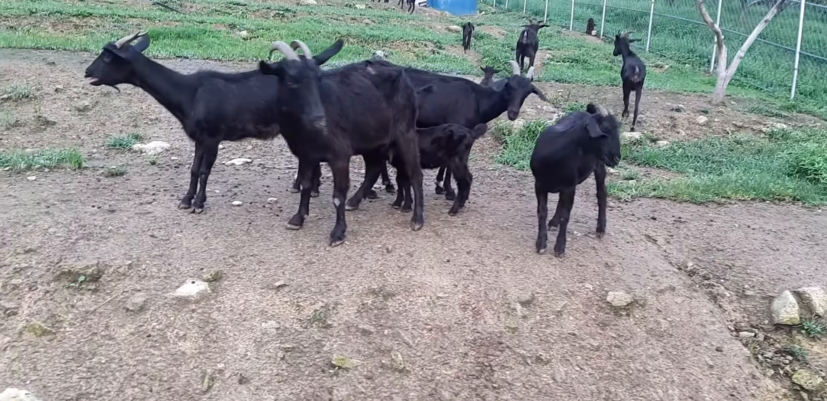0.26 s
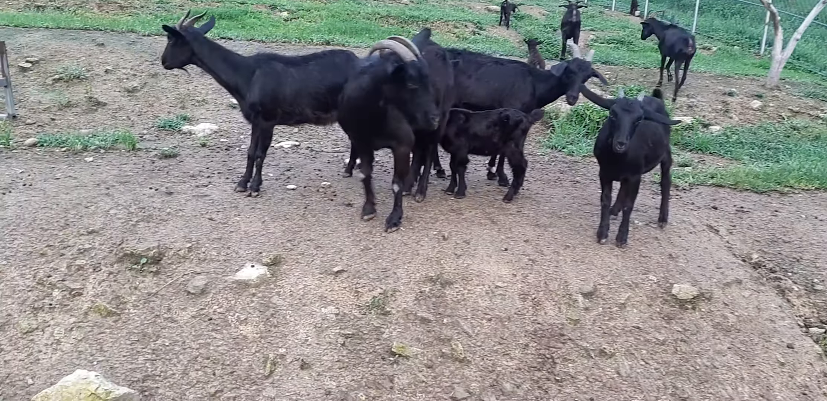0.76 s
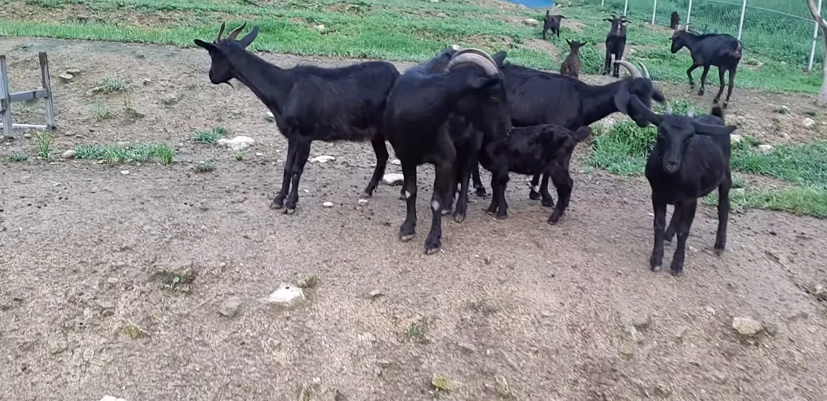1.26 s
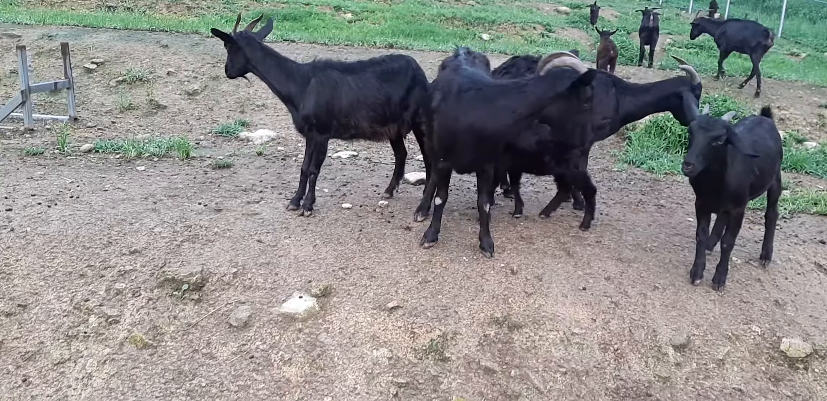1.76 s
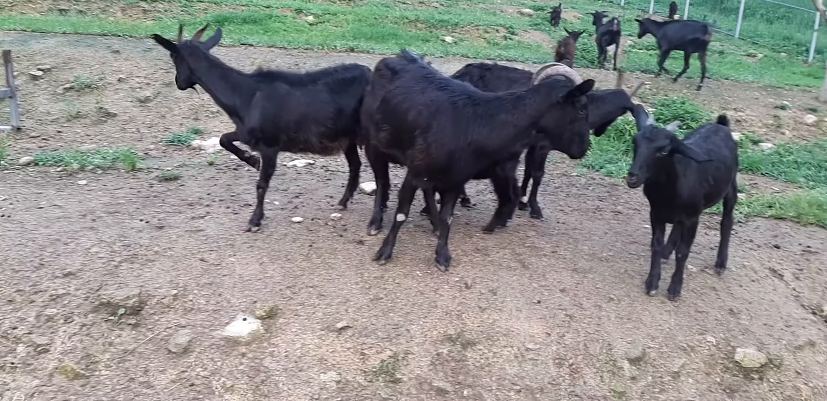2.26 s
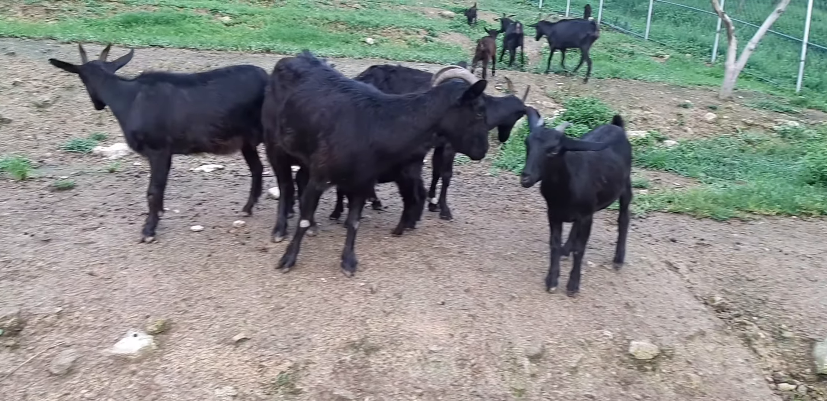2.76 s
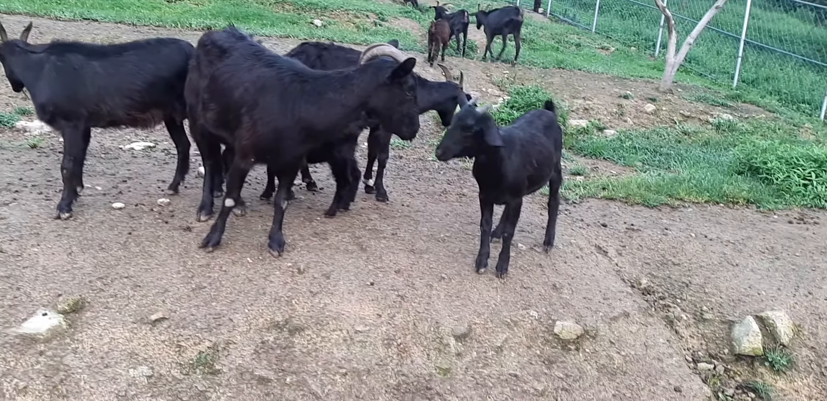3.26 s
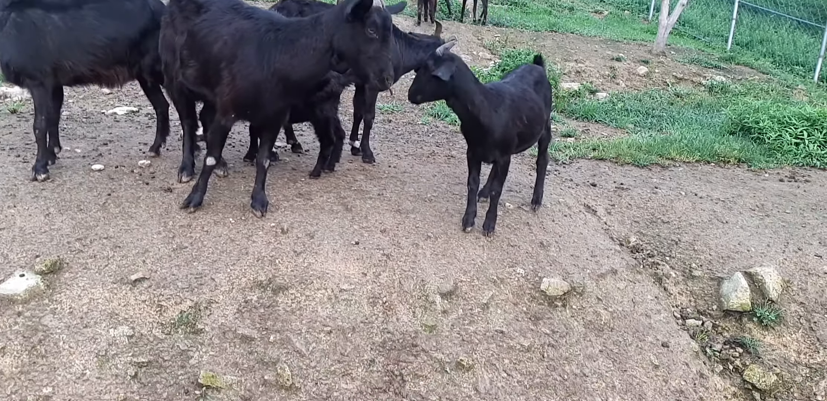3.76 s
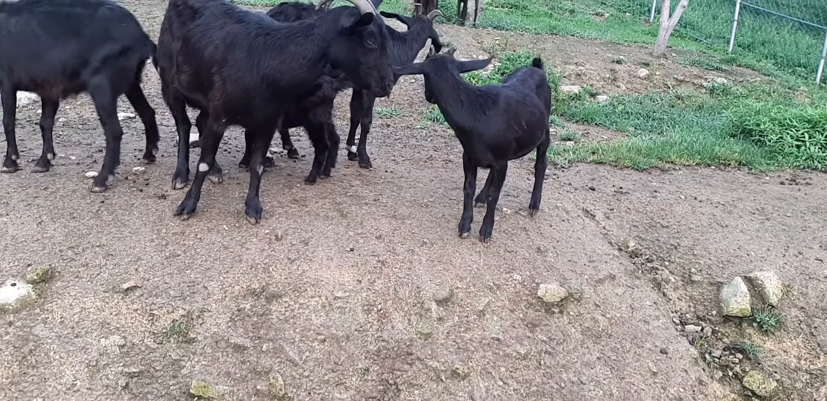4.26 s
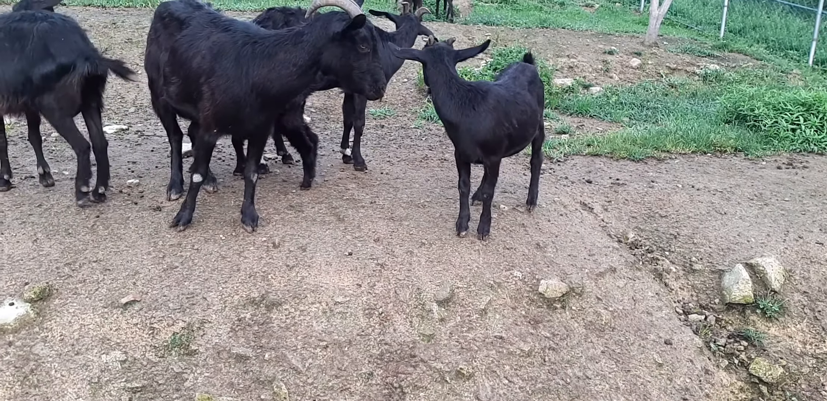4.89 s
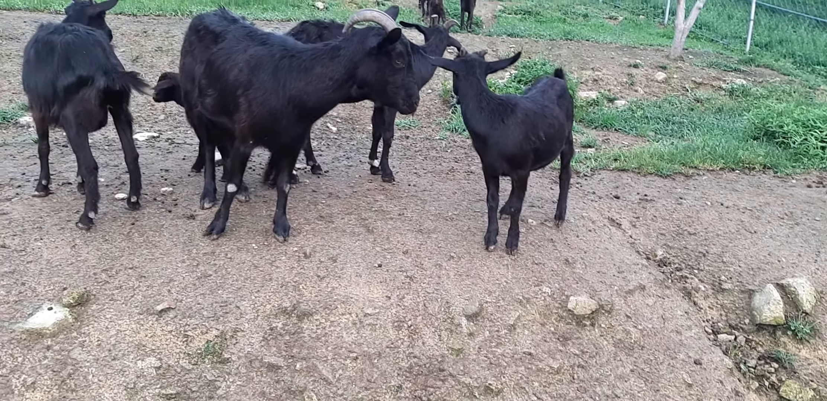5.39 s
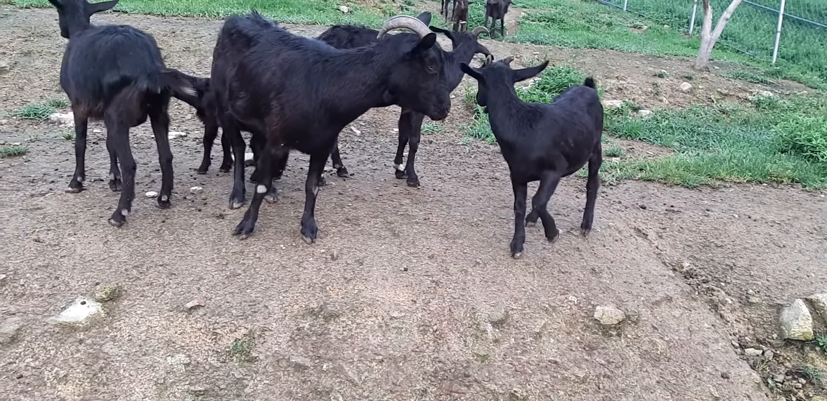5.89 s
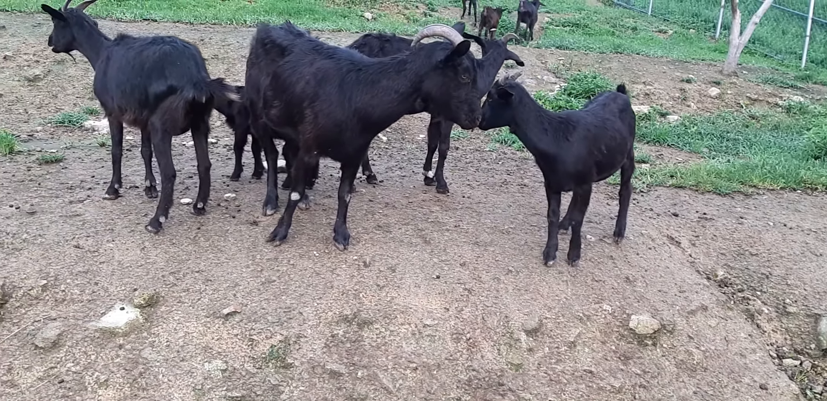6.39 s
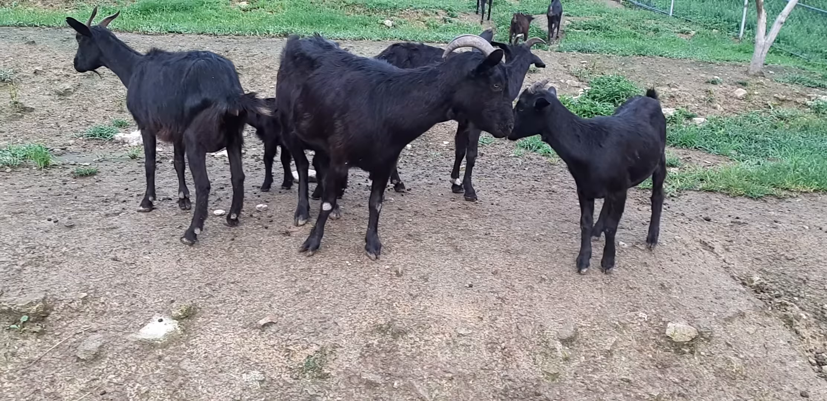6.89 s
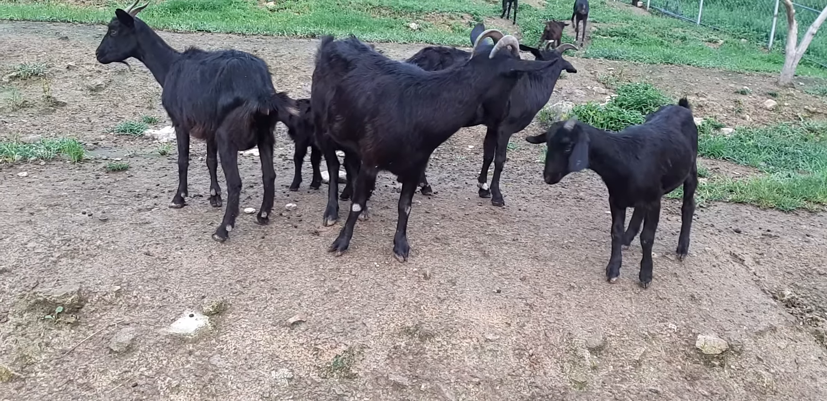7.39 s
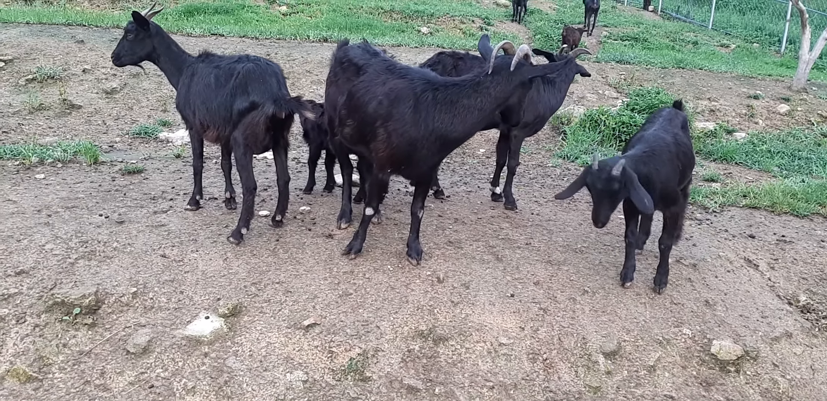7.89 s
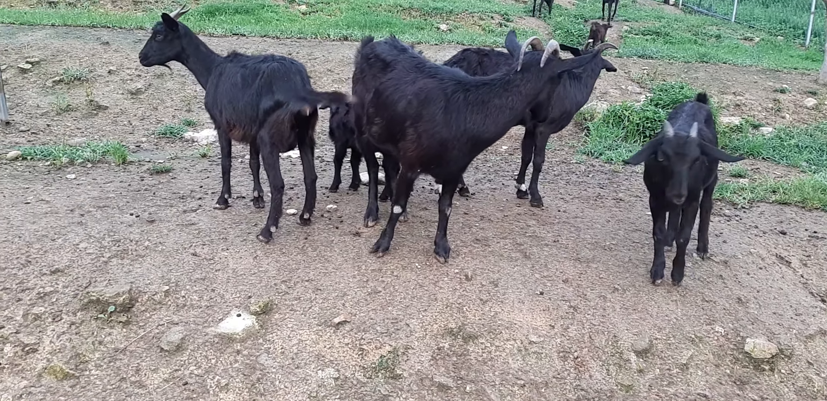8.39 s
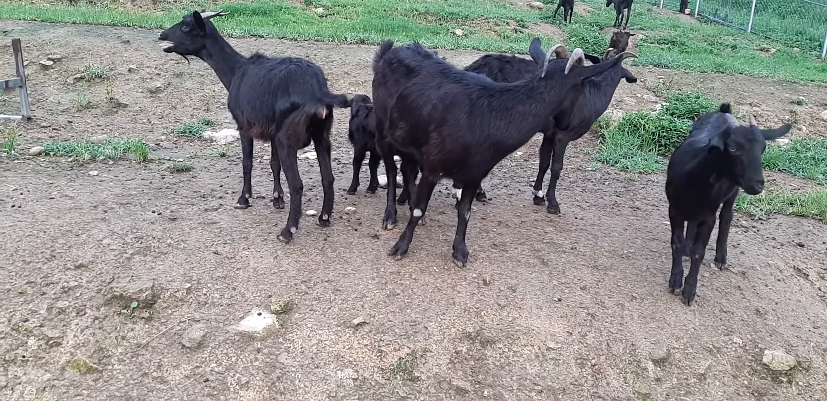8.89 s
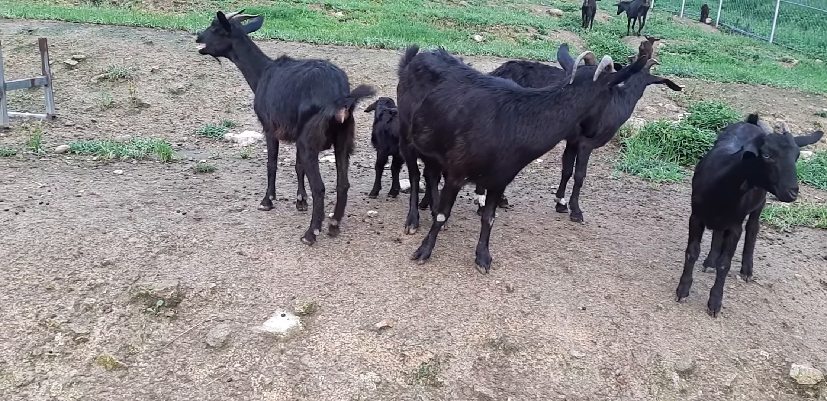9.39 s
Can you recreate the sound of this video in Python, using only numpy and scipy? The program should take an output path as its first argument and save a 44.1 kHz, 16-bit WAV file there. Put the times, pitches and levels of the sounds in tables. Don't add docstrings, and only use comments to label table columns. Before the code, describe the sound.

A near goat on the left bleats in throbbing bursts while herd members hum, call and yell over a steady insect hiss outdoors.

```python
import sys
import numpy as np
from scipy import signal
from scipy.fft import rfft, irfft, next_fast_len
from scipy.io import wavfile
from scipy.ndimage import uniform_filter1d, minimum_filter1d

SR = 44100
rng = np.random.default_rng(int(sys.argv[2]) if len(sys.argv) > 2 else 0)


def amplitude_ratio(level_db):
    exponent = np.asarray(level_db, float) / 20
    return 10 ** exponent


def pcm_store(signal):
    levels = np.round(np.clip(np.atleast_2d(signal), -1, 1) * 32767)
    wavfile.write(sys.argv[1], SR, levels.astype(np.int16).T)


N = 425565

# freq_hz, level_db
INSECT_SPECTRUM = [(1650, -72), (2800, -52), (2990, -28.5), (3350, -11.5), (3660, 0.5), (4320, -5),
                   (4710, 0), (5680, -1.5), (6100, -4.5), (6700, -29.5), (8630, -15), (10600, -40),
                   (15700, -36.5)]
# freq_hz, density_db_per_hz
WIND_SPECTRUM = [(15, -61), (25, -23.5), (70, -2.5), (114, -0.5), (242, -16), (429, -15), (637, -20.5),
                 (791, -17.5), (1400, -24.5), (2800, -25.5), (3640, -64.5), (6160, -120)]

# time_s, pitch_hz, effort_db
HUM_CALLS = [
    [(0.0, 424, -47.5), (0.264, 428, -46), (0.38, 435.5, -50.5), (0.416, 427, -46), (0.47, 385, -53)],
    [(9.24, 389, -70), (9.264, 388, -45), (9.332, 388, -56), (9.358, 422, -50), (9.458, 428, -51.5),
     (9.65, 447, -51)],
]
# center_hz, width_hz, level_db
HUM_NOSE_MODES = [(388, 480, 7), (835, 200, -29)]

# time_s, top_pitch_hz, effort_db
DOE_BLEAT_1 = [
    (0.004, 276.5, -35),
    (.094, 300.8, -32.5),
    (.21, 291.3, -35),
    (.33, 297.4, -35),
    (.452, 243, -38),
]
DOE_BLEAT_2 = [
    (2.505, 152.9, -61),
    (2.622, 247, -47),
    (2.73, 286.6, -35),
    (2.841, 303.6, -29),
    (2.949, 315.5, -30),
    (3.051, 328, -28.5),
    (3.154, 328.3, -28.5),
    (3.261, 328.6, -29),
    (3.371, 327.4, -29),
]
DOE_BLEAT_3 = [
    (5.458, 193, -90),
    (5.578, 242.4, -48.5),
    (5.682, 286.9, -46),
    (5.787, 321.4, -36),
    (5.894, 321, -34.5),
    (5.993, 325.3, -32.5),
    (6.092, 325.7, -32),
    (6.186, 323.6, -32),
    (6.287, 325, -33.5),
]
DOE_BLEAT_4 = [(8.452, 195.2, -66), (8.567, 259.9, -47), (8.68, 290, -30.5), (8.788, 304.1, -28.5),
               (8.891, 312.6, -28.5), (8.995, 320.1, -28), (9.098, 323.4, -27.5), (9.21, 319.6, -28.5),
               (9.32, 320.4, -28.5), (9.434, 320.8, -29), (9.545, 309.2, -31), (9.655, 280, -35.5)]
# full_chest_db, dip_db, dip_share_of_gap, last_fall_s, hold_s
DOE_BLEAT_MANNER = [
    (-70, 8, .42, 0.029, .016),
    (-51.5, 7.5, 0.4, 0.038, 0.017),
    (-53.5, 4.5, .4, 0.044, 0.019),
    (-56, 6.5, .4, .05, 0.018),
]
# center_hz, width_hz, level_db
DOE_CHEST_MODES = [(158.4, 47, 6.5), (335, 132, 6.5), (558, 63, -1.5), (1130, 72, -9)]
# center_hz, width_hz, level_db
DOE_MOUTH_MODES = [
    [(600, 120, -8), (780, 143, 4), (1210, 300, -4), (2200, 250, 2.5), (3290, 870, 8), (4630, 1400, -11),
     (9500, 3000, -28), (13950, 3300, -48)],
    [(780, 720, -3.5), (1240, 300, -0.5), (2140, 260, 6.5), (3500, 670, 14), (4700, 530, -17),
     (9470, 2000, -22), (14000, 1600, -32)],
    [(867, 350, 3), (1280, 190, 0), (2214, 460, 5), (3400, 520, 13), (4760, 300, -20), (9500, 3700, -18),
     (13980, 4700, -44)],
    [(830, 250, 1), (1240, 360, -12), (2200, 170, -4), (2540, 390, -8), (3340, 690, 9), (4630, 1200, -2),
     (8800, 5500, -26), (14200, 8600, -37)],
]
# center_hz, width_hz, level_db
DOE_OPEN_MODES = [
    [(600, 170, -12), (760, 170, 0), (1270, 520, -7), (2070, 220, -3), (3320, 1150, 3), (4600, 1300, -3.5),
     (9500, 3000, -25), (13950, 3300, -46)],
    [(735, 305, -2.5), (1245, 330, 0), (2177, 203, 2.5), (3020, 430, 11.5), (3370, 400, 10.5),
     (3840, 1070, 0), (9800, 2700, -24), (14000, 1400, -29.5)],
    [(873, 92, 5), (1264, 220, 0.5), (2216, 170, 5.5), (3320, 760, 10.5), (3600, 180, 3), (4860, 300, -20),
     (9500, 3700, -34), (14040, 4700, -42)],
    [(861, 150, 5), (1240, 490, -11), (2168, 280, -1), (2580, 370, -3.5), (3164, 350, 7), (3680, 480, 0),
     (4570, 560, -9), (9060, 7000, -29.5), (14300, 7500, -32.5)],
]
# start_s, end_s
DOE_MOUTH_MOVES = [
    (.1, .4),
    (2.75, 3.01),
    (5.75, 6.6),
    (8.63, 8.8),
]
# time_s, pitch_hz, chest_db, mouth_db
DOE_GRUNTS = [
    [(.485, 214, -50, -57), (.505, 227, -49, -34), (.525, 242.6, -37, -43.5), (.54, 222, -44, -37),
     (.555, 198, -57, -54)],
    [(3.405, 265.4, -60, -52), (3.425, 257, -62, -51), (3.455, 272.7, -55, -42), (3.485, 265.7, -49, -35),
     (3.505, 256.7, -59, -41), (3.525, 227.3, -53, -50), (3.55, 233.7, -46, -45.5),
     (3.578, 207.6, -43, -43.5), (3.61, 189, -54, -67)],
]
# time_s, pitch_hz, effort_db
DOE_CROAK = [
    [(2.425, 110.2, -67), (2.46, 119.5, -54), (2.5, 127, -45.5), (2.52, 165, -62), (2.54, 150, -58)],
]
# time_s, pitch_hz, effort_db
DOE_RATTLE = [
    [(6.31, 215.4, -54), (6.35, 194.2, -45.5), (6.45, 183, -48), (6.475, 169.6, -82)],
]
# time_s, pitch_hz, effort_db
DOE_WHINE = [
    [(8.595, 213, -50), (8.61, 220, -67), (8.64, 249, -55), (8.655, 256, -52)],
]
# center_hz, width_hz, level_db
WHINE_MODES = [(710, 160, 0), (1010, 200, -14)]

# time_s, pitch_hz, effort_db
KID_CALLS = [
    [(0.3, 473.6, -78), (0.318, 479.5, -43), (0.362, 472, -42), (0.46, 466, -42), (0.516, 481, -42),
     (0.55, 469, -52)],
    [(.55, 469, -43.5), (.585, 505.7, -40), (.62, 459.4, -53), (.655, 516.4, -38), (.7, 467, -50),
     (.75, 500, -47), (.79, 460, -48), (.9, 462, -47)],
    [(5.48, 438, -61), (5.515, 453, -46), (5.56, 460, -49), (5.642, 469.4, -45.5), (5.846, 477.4, -47),
     (5.886, 465, -46), (6.272, 460, -52), (6.324, 432, -72.5), (6.42, 425, -56)],
]
# time_s, pitch_hz, effort_db
THIN_CALLS = [
    [(1.35, 326.5, -63), (1.368, 341, -53), (1.408, 362, -54), (1.438, 312, -58), (1.45, 311, -61)],
    [(7.93, 422, -73), (7.968, 431, -62), (8.07, 455, -63), (8.19, 460, -70), (8.452, 488, -60),
     (8.64, 473, -61), (8.68, 480, -72)],
]
# time_s, pitch_hz, effort_db
KID_MURMURS = [
    [(5.36, 312, -82), (5.43, 397, -65), (5.5, 464, -65), (5.57, 450, -66)],
    [(6.65, 488, -94), (6.762, 491, -75), (6.8, 445, -85), (7.05, 452, -92)],
]
# center_hz, width_hz, level_db
KID_CHEST_MODES = [(460, 310, 0)]
# center_hz, width_hz, level_db
KID_MOUTH_MODES = [(974, 320, 14.7), (1400, 2400, 11), (2300, 450, 18), (2570, 830, 21.8),
                   (4230, 560, 32.5)]
# center_hz, width_hz, level_db
THIN_CALL_MODES = [(1400, 175, -8), (2854, 85, -4.5)]

# time_s, pitch_hz, effort_db
LOW_CALLS = [
    [(0.6, 201, -39.5), (0.638, 212.7, -46), (0.664, 210, -41), (0.696, 191, -46), (0.748, 220.6, -43),
     (0.79, 203, -44)],
    [(0.79, 205.4, -45), (0.836, 210, -46.5), (0.908, 213, -44), (1.03, 207, -44.5), (1.108, 210, -46),
     (1.176, 210.3, -45.5), (1.38, 208.4, -43.5), (1.482, 197, -47), (1.5, 204, -64)],
]
# time_s, pitch_hz, effort_db
LOW_SHUT_CALLS = [
    [(1.49, 206, -64), (1.528, 189, -49.5), (1.57, 210, -74)],
]
# center_hz, width_hz, level_db
LOW_CHEST_MODES = [(445, 198, 6.4), (210, 360, 0.5)]
# center_hz, width_hz, level_db
LOW_MOUTH_MODES = [(975, 210, -1.5), (1500, 3600, -13), (2413, 210, 4), (3560, 14000, -16),
                   (10620, 4300, -8.5)]
# center_hz, width_hz, level_db
LOW_LATER_MODES = [(955, 260, -6), (1496, 5000, -18), (2476, 120, -1.5), (3560, 4200, -16.5),
                   (10800, 4300, -17.5)]

# start_s, peak_db, pitch_hz
HOOF_THUDS = [
    (1.233, -79, 210),
    (2.175, -81.5, 232),
    (5.921, -72, 85),
    (9.365, -76, 298),
]

# time_s, pitch_hz, effort_db
YELL_PARTS = [
    [(1.46, 335, -71), (1.478, 322, -39.5), (1.556, 337, -37), (1.598, 340, -35), (1.794, 343, -34.5),
     (1.818, 349, -29)],
    [(1.824, 340.4, -26.5), (1.845, 335, -28), (1.916, 336.5, -24.5), (1.964, 321, -23.5),
     (2.018, 328.3, -22), (2.06, 320.4, -27), (2.09, 307.7, -32.5), (2.154, 305.8, -32.5),
     (2.19, 281.3, -34)],
    [(2.216, 259.4, -42), (2.25, 212.4, -49.5), (2.262, 214.2, -42), (2.27, 208.8, -94)],
]
# center_hz, width_hz, level_db
YELL_CHEST_MODES = [(330, 200, -12), (780, 670, 0), (1300, 490, 2), (2600, 420, 7), (3630, 660, 1.5)]
# center_hz, width_hz, level_db
YELL_MOUTH_MODES = [(995, 250, 3), (1700, 480, -16.5), (2395, 300, -1.5), (3330, 180, 3.5), (4084, 270, 3),
                    (5140, 980, -8.5), (6740, 250, -21), (14240, 3700, -30)]
# center_hz, width_hz, level_db
YELL_NARROW_MODES = [(610, 550, -8), (932, 146, -1.5), (1780, 390, -5), (2474, 170, -6), (3210, 390, -1),
                     (3985, 310, -0.5), (4680, 1400, -10.5), (14300, 5700, -30)]

# start_s, length_s, start_hz, end_hz, level_db
SNORT_NOTES = [
    (1.815, 0.022, 3386, 4800, -47),
    (1.815, 0.02, 1400, 1900, -53),
    (1.46, .03, 1000, 1200, -60),
    (2.176, 0.031, 281, 419, -52),
    (2.18, .03, 1000, 1210, -55),
    (2.29, 0.05, 1850, 1800, -72),
]
# start_s, length_s, start_hz, end_hz, level_db
BARK_NOTES = [
    (5.12, 0.036, 2250, 2160, -77),
    (5.26, 0.046, 2260, 2290, -75.5),
    (5.39, 0.088, 1700, 1816, -64.5),
    (5.41, 0.082, 2300, 2520, -58),
    (5.475, 0.047, 2500, 2200, -51.5),
    (5.48, 0.039, 2000, 1700, -55),
    (5.63, 0.039, 2510, 2054, -54),
    (5.7, 0.043, 2700, 1874, -50),
    (5.715, 0.034, 2000, 1400, -58),
]

# time_s, pitch_hz, effort_db
FAR_GOAT_PUSHES = [
    (3.735, 352.6, -53.5),
    (3.822, 349.5, -53.5),
    (3.912, 342.3, -54.5),
    (4.012, 341, -54.5),
    (4.11, 338.4, -54),
]
# center_hz, width_hz, level_db
FAR_CHEST_MODES = [(328, 200, 0)]
# center_hz, width_hz, level_db
FAR_MOUTH_MODES = [(687, 280, -5), (1127, 185, 2.5), (1915, 350, -10.5), (2940, 250, 5.5)]

# start_s, length_s, start_hz, end_hz, level_db
BIRD_NOTES = [(6.801, 0.12, 1230, 1300, -68.5), (6.83, 0.057, 1780, 1680, -62),
              (6.863, 0.058, 1750, 1340, -62.5), (7.28, 0.14, 1283, 1260, -69),
              (7.301, 0.042, 2120, 1610, -56.5), (7.34, 0.056, 1784, 1400, -60),
              (7.5, 0.039, 1650, 1950, -58.5), (7.708, 0.074, 1700, 2120, -60.5),
              (7.76, 0.147, 1300, 1240, -66.5), (7.782, 0.092, 1810, 1445, -62),
              (7.834, 0.095, 1664, 1500, -66.5), (8.238, 0.19, 1240, 1310, -65),
              (8.271, 0.075, 1764, 1400, -59)]

# delay_s, level_db
SLOPE_ECHOES = [
    (.0013, -24),
    (.0045, -21),
    (.011, -11),
    (.027, -13),
    (.052, -18.5),
    (.09, -16.5),
]
# freq_hz, level_db
LEFT_SENSITIVITY = [(60, -1.0), (110, -2.0), (200, -2.5), (380, -3.0), (700, -3.0), (1290, -5.5),
                    (2380, -3.0), (4400, -4.5), (8120, -13.0), (15000, -4.5)]


def coloured(x, points):
    hz, level_db = np.transpose(points)
    size = next_fast_len(N)
    bins_hz = np.fft.rfftfreq(size, 1 / SR)
    gain = amplitude_ratio(np.interp(np.log(bins_hz + 1), np.log(hz), level_db))
    return irfft(rfft(x, size) * gain, size)[..., :N]


def rms_one(x):
    return x / np.sqrt(np.mean(x ** 2) + 1e-20)


def highpass(x, cutoff_hz):
    return signal.lfilter(*signal.butter(2, cutoff_hz, "high", fs=SR), x)


def drift(size, rate_hz):
    r = np.exp(-2 * np.pi * rate_hz / SR)
    noise = rng.standard_normal(size + 9000)
    return rms_one(signal.lfilter([1], [1, -2 * r, r * r], noise)[9000:])


def throat(source, modes):
    out = 0
    for k, (hz, width_hz, level_db) in enumerate(modes):
        r = np.exp(-np.pi * width_hz / SR)
        row = [(1 - r * r) / 2, 0, (r * r - 1) / 2, 1, -2 * r * np.cos(2 * np.pi * hz / SR), r * r]
        out = out + (-1) ** k * amplitude_ratio(level_db) * signal.sosfilt([row, row], source)
    return rms_one(out)


def voice(calls, chest, mouth, jitter, breath, sharp, slack=0., pure=0., flutter_hz=25, fray=0.,
          later=None, moves_s=(0, 1), lips_hz=60, snuffle=0.):
    out = np.zeros(N)
    for rows in calls:
        s, *columns = np.transpose(rows)
        start, stop = max(int(s[0] * SR), 0), min(int(s[-1] * SR), N)
        t = np.arange(start, stop) / SR
        hz, chest_db, mouth_db = (uniform_filter1d(np.interp(t, s, c), size=250, mode="nearest")
                                  for c in columns)
        dip_db = -minimum_filter1d(-mouth_db, size=4000) - mouth_db
        uneven = jitter * (4 + fray * np.minimum(dip_db, 15))
        phase = 2 * np.pi * np.cumsum(hz * (1 + uneven * drift(len(t), flutter_hz))) / SR
        ratio = np.clip(sharp - slack * (mouth_db.max() - mouth_db), .6, .96)
        pulses = ((1 - ratio ** 2) / (1 - 2 * ratio * np.cos(phase) + ratio ** 2) - 1) / ratio
        pulses *= amplitude_ratio(160 * np.minimum(uneven, .007) * drift(len(t), flutter_hz))
        hiss = signal.lfilter([1, -.7], [1], rng.standard_normal(len(t)))
        puffs = hiss * (1 + np.cos(phase)) * ratio ** 8
        nasal = pure * np.cos(phase) + throat(pulses + snuffle * puffs, chest)
        source = highpass(pulses + breath * puffs, lips_hz)
        oral = throat(source, mouth)
        if later:
            oral += np.interp(t, moves_s, [0, 1]) * (throat(source, later) - oral)
        edge = np.clip(np.minimum((t - s[0]) / 0.0043, (s[-1] - t) / 0.0022), 0, 1)
        edge[t < .012] = 1
        out[start:stop] += edge * (amplitude_ratio(chest_db) * rms_one(nasal) + amplitude_ratio(mouth_db) * oral)
    return out


def held(calls, chest_db, mouth_db):
    return [[(s, hz, db + chest_db, db + mouth_db) for s, hz, db in rows] for rows in calls]


def glides(notes, hoarse, spread_hz, arch):
    out = np.zeros(N)
    for s, length_s, start_hz, end_hz, level_db in notes:
        u = np.linspace(0, 1, int(length_s * SR))
        middle_hz = arch * (start_hz + end_hz) / 2
        hz = np.interp(u, [0, .5, 1], [start_hz, middle_hz, end_hz])
        phase = 2 * np.pi * np.cumsum(hz) / SR
        rough = 1 + hoarse * drift(len(u), spread_hz)
        start = int(s * SR)
        out[start:start + len(u)] += amplitude_ratio(level_db) * np.sin(np.pi * u) * rough * np.sin(phase)
    return out


def placed(x, left_lag_s, wet_db):
    t, half_lag = np.arange(N), left_lag_s * SR / 2
    dull = signal.lfilter([.55], [1, -.45], x)
    out = np.array([np.interp(t - half_lag, t, x), np.interp(t + half_lag, t, x)])
    for k, (s, level_db) in enumerate(SLOPE_ECHOES):
        for side in (0, 1):
            lag = int(s * SR * (1 + 0.0387 * ((side + k) % 2)))
            out[side, lag:] += amplitude_ratio(level_db + wet_db) * dull[:-lag]
    return out


def insects():
    sizes = amplitude_ratio(1.1 * np.minimum(rng.exponential(1, (2, N)), 5)) * rng.choice([-1, 1], (2, N))
    singer = rng.integers(0, 16, (2, N))
    chorus = 0
    for k, hz in enumerate(np.geomspace(2900, 15500, 16)):
        swell = amplitude_ratio(1.35 * drift(N, 25))
        chorus = chorus + swell * throat(sizes * (singer == k), [(hz, 0.22 * hz, 0)]) * np.sqrt(hz)
    side_db = np.array([[1.5], [4.5]])
    return amplitude_ratio(-47.5 + side_db) * rms_one(coloured(chorus, INSECT_SPECTRUM))


def wind():
    shared, *own = rng.standard_normal((3, N))
    bass = signal.butter(1, 250, fs=SR)
    mixed = signal.lfilter(*bass, shared) + own - signal.lfilter(*bass, own)
    return amplitude_ratio(-66.0) * rms_one(coloured(mixed, WIND_SPECTRUM))


def hum():
    return voice(held(HUM_CALLS, chest_db=2.0, mouth_db=-45), HUM_NOSE_MODES, HUM_NOSE_MODES,
                 jitter=0.0046, breath=.1, snuffle=1.7, sharp=1.0)


def throbs(rows, manner, sag, shoulder, lean, fall_s):
    full_hz, chest_db_per_hz, closing_db_per_db, dip_db_per_db = 320, .095, 1.3, .28
    rise_s, top_s = .017, .005
    full_db, base_dip_db, share, last_s, hold_s = manner
    times, tops_hz, mouths_db = np.transpose(rows)
    faint_db = mouths_db.max() - mouths_db
    closing = times > times[mouths_db.argmax()]
    chests_db = full_db + chest_db_per_hz * (tops_hz - full_hz) - closing_db_per_db * faint_db * closing
    dips_db = base_dip_db + dip_db_per_db * faint_db
    waits = np.append(share * np.diff(times), last_s)
    knots = [(times[0] - .07, sag * tops_hz[0], chests_db[0] - 3, mouths_db[0] - 6.5)]
    for s, hz, chest, mouth, wait, dip in zip(times, tops_hz, chests_db, mouths_db, waits, dips_db):
        drop_s = s + min(hold_s + fall_s, wait - .004)
        knots.append((s - 2 * rise_s, shoulder * hz, chest + 8.0 - 0.94 * dip, mouth - lean * dip))
        knots.append((s - rise_s, .925 * hz, chest + 15.0, mouth + 0.5))
        knots.append((s - top_s, .995 * hz, chest + 19.5, mouth + 3.5))
        knots.append((s + top_s, .995 * hz, chest + 19.5, mouth + 2.0))
        knots.append((s + hold_s, .89 * hz, chest + 12.0, mouth + 1.2))
        knots.append((drop_s, sag * hz, chest + 2.0 - .9 * dip, mouth - 1.1 * dip))
        knots.append((s + wait, 1.01 * sag * hz, chest - 0.34 * dip, mouth - 1.45 * dip))
    return knots + [(s + wait + 0.069, sag * hz, -90, -90)]


def doe():
    out = np.zeros(N)
    bleats = DOE_BLEAT_1, DOE_BLEAT_2, DOE_BLEAT_3, DOE_BLEAT_4
    for rows, manner, mouth, opened, moves_s in zip(bleats, DOE_BLEAT_MANNER, DOE_MOUTH_MODES,
                                                    DOE_OPEN_MODES, DOE_MOUTH_MOVES):
        knots = throbs(rows, manner, sag=.835, shoulder=.865, lean=0.45, fall_s=0.00786)
        out += voice([knots], DOE_CHEST_MODES, mouth, jitter=.0011, fray=1.5, breath=.65, snuffle=1.5,
                     sharp=1.0, slack=0.01, pure=1.27, flutter_hz=70.0, lips_hz=414,
                     later=opened, moves_s=moves_s)
    slack_mouth = DOE_MOUTH_MODES[1]
    out += voice(DOE_GRUNTS, DOE_CHEST_MODES, slack_mouth[:4], jitter=.002, breath=.5,
                 sharp=0.85, pure=0.86, lips_hz=350)
    out += voice(held(DOE_RATTLE, chest_db=-12.5, mouth_db=-4), DOE_CHEST_MODES, slack_mouth[:3],
                 jitter=0.039, breath=1.7, sharp=0.84, flutter_hz=89)
    out += voice(held(DOE_CROAK, chest_db=0.5, mouth_db=-8.5), DOE_CHEST_MODES, slack_mouth[:2],
                 jitter=0.023, breath=1.2, sharp=0.6, flutter_hz=60)
    out += voice(held(DOE_WHINE, chest_db=0, mouth_db=6), DOE_CHEST_MODES, WHINE_MODES,
                 jitter=0.0032, breath=.3, sharp=0.94)
    return out


def kids():
    near = voice(held(KID_CALLS, chest_db=-26, mouth_db=0), KID_CHEST_MODES, KID_MOUTH_MODES,
                 jitter=.0025, breath=.55, sharp=0.77)
    calls = held(THIN_CALLS, chest_db=-21.5, mouth_db=3.5)
    murmurs = held(KID_MURMURS, chest_db=4.5, mouth_db=-26)
    far = voice(calls + murmurs, KID_CHEST_MODES, THIN_CALL_MODES, jitter=.002, breath=.1, sharp=0.71,
                later=THIN_CALL_MODES[:1], moves_s=(8.5, 8.58))
    return near + far


def low_goat():
    calls = held(LOW_CALLS, chest_db=-8.5, mouth_db=-1.5)
    shut = held(LOW_SHUT_CALLS, chest_db=6.0, mouth_db=0.5)
    return voice(calls + shut, LOW_CHEST_MODES, LOW_MOUTH_MODES, jitter=.003, breath=.8, snuffle=2.5,
                 sharp=0.91, flutter_hz=37.0, later=LOW_LATER_MODES, moves_s=(.95, 1.15))


def hooves():
    out, t = np.zeros(N), np.arange(3000) / SR
    envelope = t / 0.0041 * np.exp(1 - t / 0.0013)
    for s, peak_db, hz in HOOF_THUDS:
        start = int(s * SR)
        out[start:start + len(t)] += amplitude_ratio(peak_db + 47.0) * np.sin(2 * np.pi * hz * t) * envelope
    return highpass(out, 55)


def yell():
    nose, opened, fading = YELL_PARTS
    (nose_rows,) = held([nose], chest_db=0.0, mouth_db=-32.0)
    (open_rows,) = held([opened + fading], chest_db=-8, mouth_db=3.0)
    return voice([nose_rows + open_rows], YELL_CHEST_MODES, YELL_MOUTH_MODES, jitter=.0014, breath=.12,
                 snuffle=.15, sharp=.94, later=YELL_NARROW_MODES, moves_s=(1.92, 2.08))


def snorts_and_barks():
    snorts = glides(SNORT_NOTES, hoarse=5.2, spread_hz=502, arch=1.01)
    barks = glides(BARK_NOTES, hoarse=2.66, spread_hz=340, arch=1.01)
    return highpass(snorts + barks, 160)


def trembles(rows):
    start_s, sag = 3.545, 0.8
    knots = [(start_s, rows[0][1], -62), (start_s + 0.031, rows[0][1], rows[0][2])]
    for k, (s, hz, db) in enumerate(rows):
        dip_db = 3.5 + 3.5 * k
        knots += [(s - .045, .975 * hz, db - 2.5), (s - .022, 1.005 * hz, db), (s, .99 * hz, db - .5),
                  (s + 0.0153, sag * hz, db - 0.57 * dip_db), (s + 0.026, 1.1 * sag * hz, db - dip_db)]
    return knots + [(s + 0.071, sag * hz, db - 29)]


def far_goat():
    return voice(held([trembles(FAR_GOAT_PUSHES)], chest_db=-10.5, mouth_db=1), FAR_CHEST_MODES,
                 FAR_MOUTH_MODES, jitter=.002, fray=.2, breath=.3, sharp=1.0, slack=0.0068,
                 flutter_hz=49.0, later=FAR_MOUTH_MODES[:3], moves_s=(3.75, 4.2))


def birds():
    return glides(BIRD_NOTES, hoarse=0.99, spread_hz=230, arch=1.055)


def scene():
    left = placed(-doe(), -7 / SR, wet_db=-4) + placed(birds(), -6 / SR, wet_db=2.5)
    middle = hum() + kids() + low_goat() + hooves() + snorts_and_barks() + far_goat()
    ahead = placed(middle, 2 / SR, wet_db=1.0)
    right = placed(-yell(), 8 / SR, wet_db=-9.5)
    return left + ahead + right + insects() + wind()


def low_pass(x):
    return signal.sosfilt(signal.butter(12, 15750, fs=SR, output="sos"), x)


def record(dry):
    mix = np.array([coloured(dry[0], LEFT_SENSITIVITY), dry[1]])
    return low_pass(mix)


dry = scene()
out = record(dry)
pcm_store(out)
```